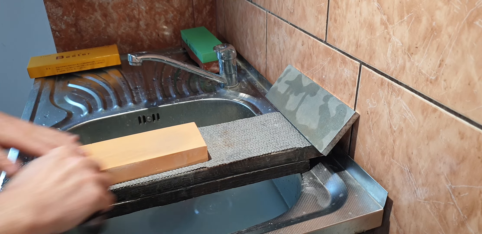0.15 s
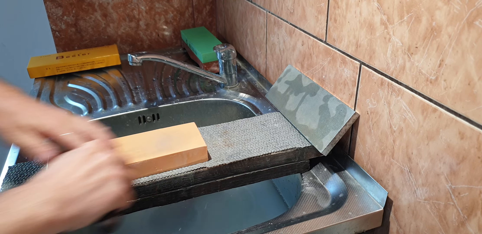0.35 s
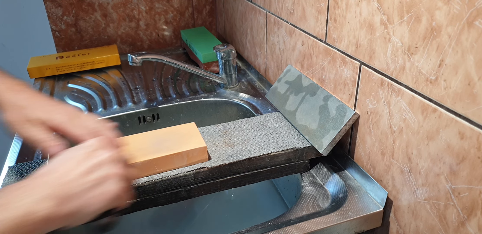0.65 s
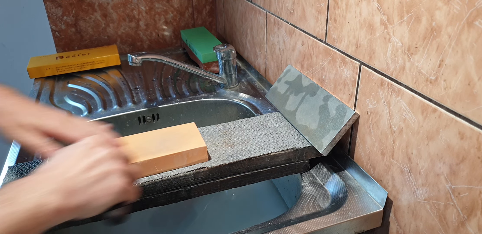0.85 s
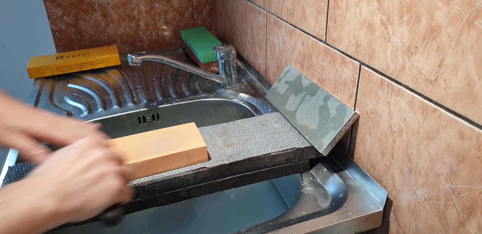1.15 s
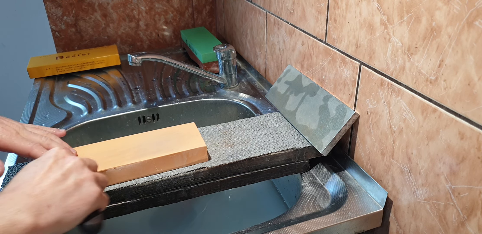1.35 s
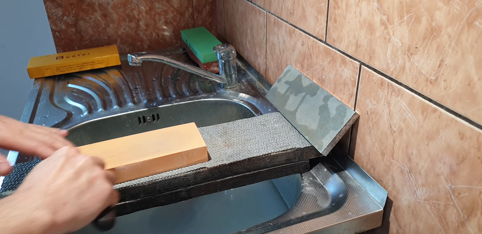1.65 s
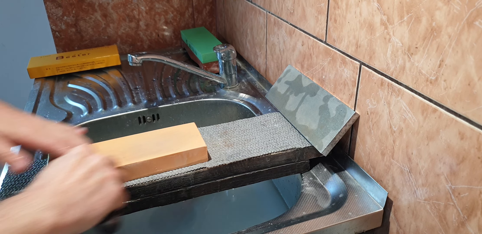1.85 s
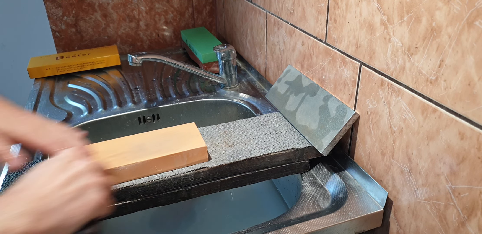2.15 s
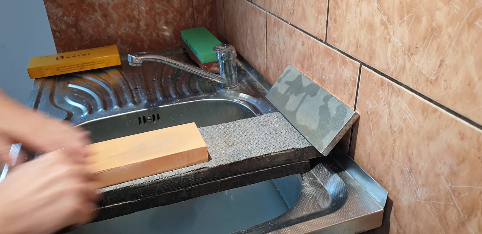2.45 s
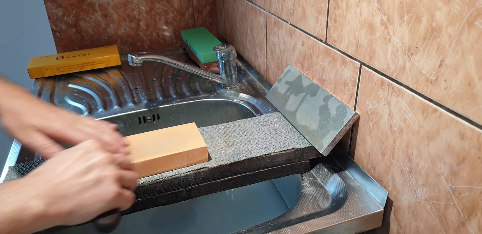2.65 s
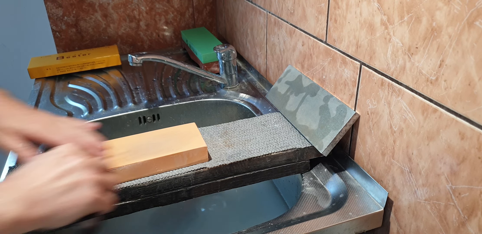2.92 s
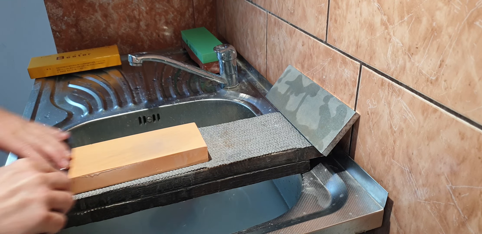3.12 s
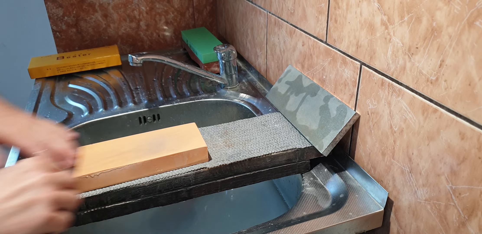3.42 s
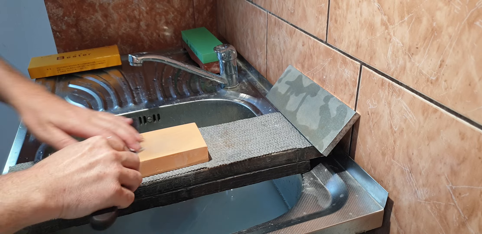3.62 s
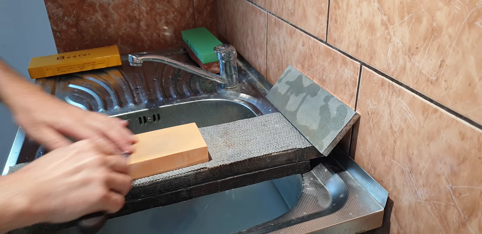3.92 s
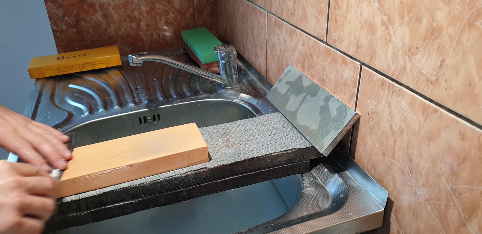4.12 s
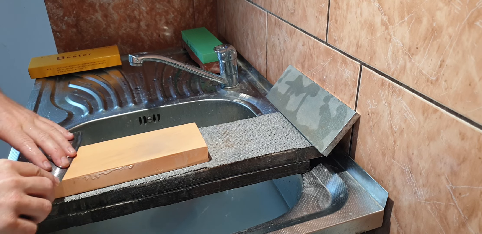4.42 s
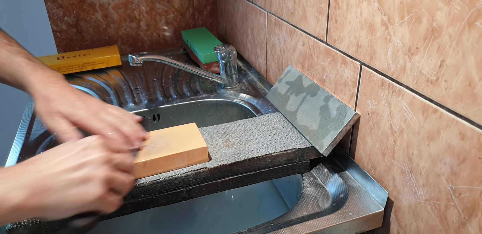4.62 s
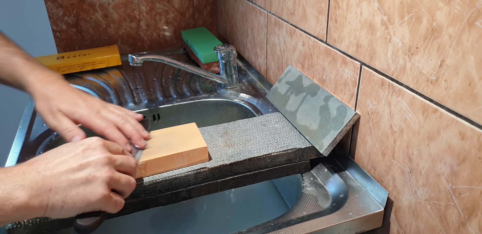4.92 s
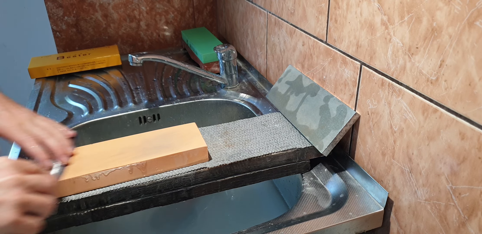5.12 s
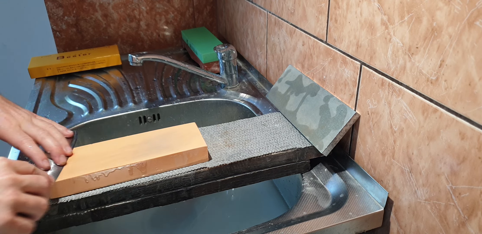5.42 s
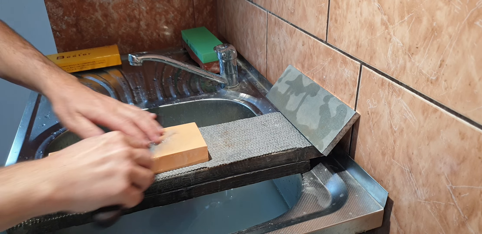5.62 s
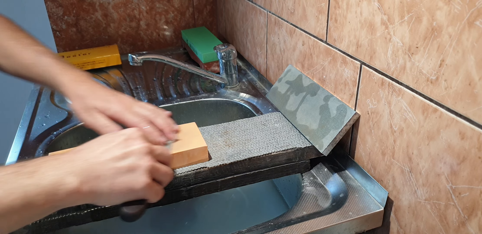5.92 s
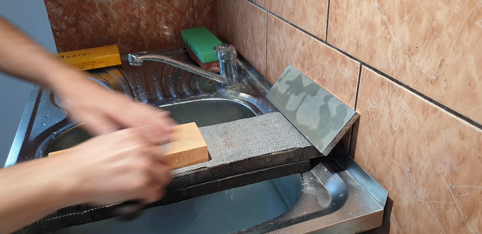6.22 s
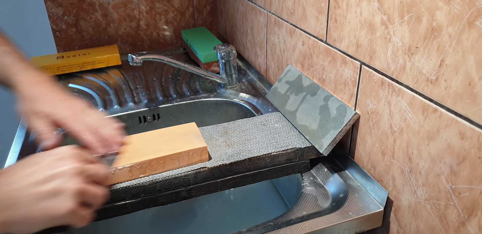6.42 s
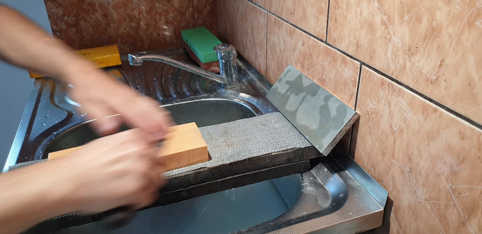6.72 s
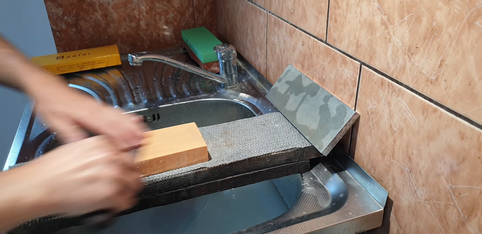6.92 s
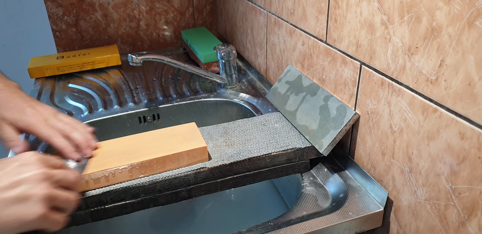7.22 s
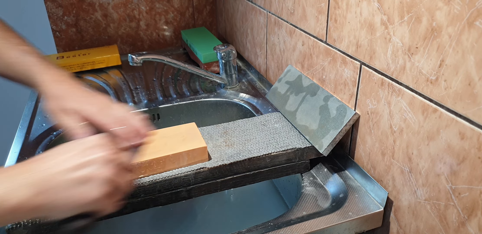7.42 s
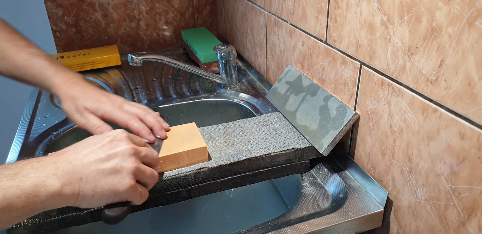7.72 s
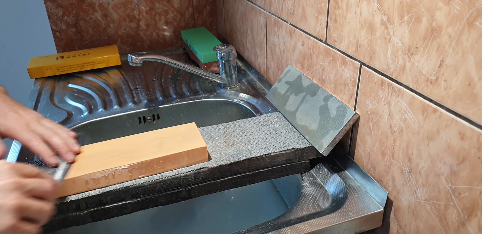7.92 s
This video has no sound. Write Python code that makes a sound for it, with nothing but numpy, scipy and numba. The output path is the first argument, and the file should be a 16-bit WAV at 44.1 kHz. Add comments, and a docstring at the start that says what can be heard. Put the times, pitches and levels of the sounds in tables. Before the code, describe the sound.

A steel knife blade scrapes quickly back and forth on a wet whetstone, gritty rasping and hissing strokes over a metal sink.

```python
"""Knife on a wet whetstone

A steel knife is ground back and forth on a wet whetstone that lies on a plank across a steel sink.
Random grit impulses make the edge hiss and drive moving resonators, the modes of the blade.
Low-coloured noise makes the plank thrum and the basin drum; decaying sines ring the sink at each knock.
Bursts of dense reflections scatter the steel's sound to two microphones, over faint kitchen noise."""
import sys
import numpy as np
from scipy import signal
from scipy.fft import rfft, irfft, next_fast_len
from scipy.io import wavfile
from scipy.ndimage import uniform_filter1d, map_coordinates
from numba import njit

SR = 44100
rng = np.random.default_rng(int(sys.argv[2]) if len(sys.argv) > 2 else 0)


def digitize_waveform(pressure):
    """Quantize a signal to 16-bit integers and store it at the path in sys.argv[1].

    Rows of a 2-D input are taken as channels; values are limited to [-1, 1].
    """
    field = np.atleast_2d(pressure).T
    bounded = np.clip(field, -1, 1)
    quanta = np.round(bounded * 32767).astype(np.int16)
    wavfile.write(sys.argv[1], SR, quanta)


N = 355446
TIME = np.arange(N) / SR

# Passes of the knife, push and return in turn. Levels are ahead of the gains in each source.
# Columns: start_s, hiss_db, rasp_db, lean_db (pressure gained from start to end),
# swell_db (extra pressure in mid-pass), shake_db (peak shaking of the plank),
# ring_hz (mode of the free blade), bend_db (bending note)
PASSES = [(-0.04, -48, -59.5, -3, 3, -64.5, 4200.0, -109), (0.08, -57, -63.5, -3, -2.5, -59.5, 3700, -101),
          (0.232, -43, -52.0, 7, 14, -61, 4700, -106), (0.395, -51, -59, 6.5, -7.5, -59, 4170, -93.0),
          (0.563, -52.5, -58.5, 5, 7, -58.5, 4400, -95), (0.71, -50.5, -57.5, 6, 4, -61.5, 4230, -91),
          (0.875, -44.5, -56.5, 6, 7, -55, 3100, -85), (1.025, -50, -56, 7, -2, -56.0, 4270, -95),
          (1.175, -52.5, -57.0, -1, -1, -53, 4300, -93.0), (1.315, -55, -61, 6, 9, -55, 4270, -83),
          (1.47, -55.5, -62, 6, 7, -60.5, 4450, -96), (1.605, -58.5, -67, -3, 3.0, -61, 3300, -89),
          (1.75, -56.5, -65, 10, 1, -63, 4400, -96), (1.89, -56, -64, 3.0, -6, -54.5, 4650, -104),
          (2.045, -51.5, -58, 7.0, 5, -64.5, 4590.0, -97), (2.19, -54, -59.5, 8.5, -8, -68.5, 4080, -95),
          (2.345, -51, -56, -8, 2.0, -58.5, 4400, -87.0), (2.5, -51.5, -60, 14, -7, -58.5, 4140, -90),
          (2.646, -43.5, -54, -1, 7, -58.5, 4650, -78), (2.8, -49.5, -54.5, 1, -6, -58.5, 4500, -86.0),
          (2.95, -40.5, -52.5, 9, 4.5, -58.5, 3500, -79), (3.1, -49, -56.5, -4, -4.5, -60.5, 4430, -85),
          (3.267, -43, -52, 17, -0.5, -62, 3430, -84), (3.425, -50.0, -55.0, -2.0, -0.5, -61.5, 4530, -81),
          (3.591, -41, -50, -3.5, 10.5, -60.5, 3770.0, -75.5), (3.76, -50, -55.5, 2, -10, -62.5, 3520, -89),
          (3.91, -52, -57, -11, 6, -62, 4500, -85), (4.055, -50.5, -55, 3, 3, -64, 3940, -78.5),
          (4.227, -45.0, -51.5, 16, -0.5, -61, 3630, -73.5),
          (4.375, -50.5, -55.5, -4, -7, -59.5, 2980, -82.0), (4.545, -48, -54, 21.5, 0, -60, 3800, -77),
          (4.71, -49.5, -54.0, -7.0, 2, -62, 3570, -76), (4.883, -45, -53, 3.5, 0, -62.5, 3800, -77.5),
          (5.055, -50, -53.5, 7, 0, -60.5, 4080, -73), (5.213, -48, -54, -7, 4, -64, 3750.0, -76.0),
          (5.365, -52, -54.5, 9, 5, -57.5, 2980, -74.5), (5.539, -46, -52.5, 15, 4, -61.5, 3900, -78),
          (5.71, -50.5, -55, -8.5, -7, -57.5, 4720, -77.5), (5.881, -44, -52, 20, 5, -59.0, 3630, -73.5),
          (6.06, -46, -54, -6, -7, -59, 3640, -76.5), (6.22, -47.5, -53.5, 12, 7.5, -58.5, 3630, -84),
          (6.403, -50, -53.5, -19, 2, -55, 3640, -75.5), (6.579, -46.0, -52.5, 12, -2.5, -55.5, 3730, -82),
          (6.766, -48, -53, -9, 6.5, -57.5, 3730, -76), (6.953, -51.5, -54, -9, 8, -54.5, 3830.0, -80),
          (7.129, -47.5, -51.5, -4.0, -4, -55.0, 3730, -76.5),
          (7.317, -47.5, -54.0, -1, 4, -56, 3750.0, -75.5), (7.48, -46.5, -52, 2, 3, -52, 3680, -76),
          (7.657, -45.5, -53, 13, 1.0, -54, 3730, -73.5), (7.834, -48, -53, 5.5, 2, -56.5, 3810.0, -76.0),
          (8.001, -53, -58.5, 2.0, 1.0, -62, 3880, -77)]
LAST_STOP_S = 8.17  # end of the last push
TURN_DB = -9  # the steel's level dips where the knife turns round


def undb(db):
    """Decibels to amplitude ratio."""
    return 10 ** (np.asarray(db) / 20)


def unit(x):
    """Normalise to rms 1."""
    return x / np.sqrt(np.mean(x ** 2))


def curves(rows):
    """Linear interpolation in time of the columns that follow the seconds."""
    s, *columns = np.transpose(rows)
    return [np.interp(TIME, s, column) for column in columns]


def colour(x, points, share=1):
    """Spectral shaping: gains in dB are joined along log frequency and scaled by share."""
    hz, db = np.transpose(points)
    size = next_fast_len(N + 8192)
    bins_hz = np.maximum(np.fft.rfftfreq(size, 1 / SR), 1)
    gain = undb(share * np.interp(np.log(bins_hz), np.log(hz), db))
    return irfft(rfft(x, size) * gain, size)[..., :N]


@njit
def resonate(x, hz, width):
    """Resonance with a moving centre: a state-variable band-pass of gain 1 at its peak."""
    y, band, low = np.empty(len(x)), 0., 0.
    for i in range(len(x)):
        g, damping = np.tan(np.pi * hz[i] / SR), width / hz[i]
        v = (band + g * (x[i] - low)) / (1 + g * (g + damping))
        low = low + 2 * g * v
        band = 2 * v - band
        y[i] = damping * v
    return y


def walk(rate):
    """Random modulation: `rate` Gaussian knots a second joined by lines, rms 1."""
    knots = rng.standard_normal(8192)
    return unit(np.interp(TIME * rate, np.arange(len(knots)), knots))


def knife(judder_db=1.8, rasp_judder_db=0.5, chatter_db=-0.5, hiss_gain_db=-0.5, rasp_gain_db=1.0,
          bite_hiss_db=-1, bite_rasp_db=-5):
    """Friction excitation: one grit force makes the edge hiss and the blade rasp, both juddering."""
    # the arm's weight rounds every change of speed
    hiss_db, rasp_db = uniform_filter1d(scraping(), SR // 80)
    pressure_db = np.clip(hiss_db - uniform_filter1d(hiss_db, SR // 3), -6, 9)
    judder, surge = catches(), bites()
    force = edge(spot_grains_per_s=2400, scatter_db=-1.5) * undb(chatter_db * walk(520))
    hiss = undb(hiss_db + hiss_gain_db + judder_db * judder) + undb(bite_hiss_db) * surge
    rasp = undb(rasp_db + rasp_gain_db + rasp_judder_db * judder) + undb(bite_rasp_db) * surge
    return hiss * grinding(force, pressure_db) + rasp * blade(force, pressure_db)


def passes():
    """Kinematics at every moment: number of the pass, its progress 0-1, and the knife's speed 0-1."""
    push_attack_s, push_release_s = 0.016, 0.016
    return_attack_s, return_release_s = 0.0047, 0.026
    turns = np.append(np.array(PASSES)[:, 0], LAST_STOP_S)
    number = np.searchsorted(turns, TIME) - 1
    age, left = TIME - turns[number], turns[number + 1] - TIME
    is_return = number % 2
    attack = np.where(is_return, return_attack_s, push_attack_s)
    release = np.where(is_return, return_release_s, push_release_s)
    speed = np.tanh(age / attack) * np.tanh(left / release)
    return number, age / (age + left), speed


def scraping():
    """Friction grows with load: hiss and rasp levels follow the hands' pressure and dip at each turn."""
    rasp_follows = 0.47  # share of the pressure that the rasp follows
    number, progress, speed = passes()
    _, hiss_db, rasp_db, lean_db, swell_db, *_ = np.array(PASSES)[number].T
    mid_pass = np.sin(np.pi * progress) - 2 / np.pi  # mean 0 over a pass
    press_db = lean_db * (progress - .5) + swell_db * mid_pass
    return np.array([hiss_db + press_db, rasp_db + rasp_follows * press_db]) + TURN_DB * (1 - speed)


def catches(per_s=28, release_s=0.022):
    """Stick and slip: friction jumps at random moments and then lets go; mean 0, rms 1."""
    jumps = (rng.random(N) < per_s / SR) * (1 + rng.random(N))
    grip = signal.lfilter([1], [1, -np.exp(-1 / (release_s * SR))], jumps)
    return unit(grip - grip.mean())


def bites():
    """Transient friction: brief surges with a straight rise and a Gaussian decay as the edge bites."""
    # the edge bites into the stone: start_s, level_db (ahead of rise, decay and gains), length_s
    bite_rows = [(0.244, -64, 0.0082), (0.728, -51, 0.031), (2.663, -62, 0.011), (3.013, -48.5, 0.079),
                 (3.116, -52, 0.016), (3.723, -52, 0.0094), (4.035, -45, 0.013), (4.071, -55, 0.0099),
                 (4.305, -45, 0.017), (4.392, -48, 0.01), (4.667, -43, 0.011), (5.028, -50, 0.0053),
                 (5.376, -51, 0.0091), (5.722, -51.5, .014), (6.072, -53, 0.037), (6.413, -66, 0.017),
                 (7.147, -57, 0.0066), (7.23, -55, 0.036), (7.533, -45, 0.011), (7.909, -52, 0.026)]
    rise_s = .002
    surge = np.zeros(N)
    for start_s, level_db, length_s in bite_rows:
        age = np.maximum(TIME - start_s, 0)
        decay = np.exp(-np.minimum(age / length_s, 10) ** 2)
        surge += undb(level_db) * np.minimum(age / rise_s, 1) * decay
    return surge


def grit(grains_per_s, scatter_db):
    """Shot noise: abrasive grains chip the steel in random clicks of very uneven size; rms 1."""
    struck = rng.random(N) < grains_per_s / SR
    size = rng.standard_normal(N) * undb(scatter_db * rng.standard_normal(N))
    return unit(struck * size)


def edge(spot_grains_per_s, scatter_db, path_t60=0.013, count=8):
    """Superposition: spots grind at once, each reaching two microphones by its own paths."""
    return unit(sum(tiles(grit(spot_grains_per_s, scatter_db), path_t60) for _ in range(count)))


def shifting(x, patchy_db, patch_hz=149.0, turns_per_s=16.):
    """Time-varying response: the blade's weak resonances come and go as its contact slides."""
    hz, s, frames = signal.stft(x, SR, nperseg=1024)
    where = np.meshgrid(hz / patch_hz, s * turns_per_s, indexing="ij")
    pattern = unit(map_coordinates(rng.standard_normal((256, 256)), where, order=1, mode="wrap"))
    return signal.istft(frames * undb(patchy_db * pattern), SR, nperseg=1024)[1][:, :N]


def grinding(force, pressure_db, patchy_db=2.96, keen_hz=13400.0, keen_width_hz=4600.0, keen_db=-9,
             keen_by_pressure=0.84):
    """Broadband friction noise: the edge's fine hiss gains a keen top when the steel is pressed hard."""
    # broad colour of the hiss, relative: pitch_hz, level_db
    hiss_colour = [(4000, -54), (6500, -35.5), (7700, -21.5), (8500, -11), (9700, -3.5), (10800, -0.5),
                   (12300, -1), (13600, -5), (14500, -4), (15800, -10.5)]
    top = np.array([resonate(ear, np.full(N, keen_hz), keen_width_hz) for ear in force])
    keen = undb(keen_db + keen_by_pressure * pressure_db)
    mixed = (force + keen * top) / (1 + keen / 2)
    return unit(colour(shifting(mixed, patchy_db), hiss_colour))


def blade(force, pressure_db, drift=0.0094, wander_db=4.0, slide_db=3.5, slide_width_hz=260.0,
          slide_by_pressure=0.45, patchy_db=3.0):
    """Modal excitation: place and pressure of the contact decide which modes the grit rings."""
    # where the blade lies on the stone: time_s, place (0 heel, 1 belly, 2 tip)
    contact = [(0, 0), (.85, 0.49), (.95, .67), (1.08, 0), (2.4, 0.0083), (2.75, 0.63), (3.6, 1.47),
               (5.5, 1.16), (6.1, 1.43), (6.5, 0.28)]
    # blade modes, ahead of drift and the rasp's colour: pitch_hz, width_hz,
    # heel_db, belly_db, tip_db, by_pressure (dB gained per dB of pressure)
    modes = [(2073, 154, 10.5, -8, -39, -0.36), (2270, 25.5, 10, 8.5, 7, 0.1),
             (2785, 45, 2, -2.5, -4, -0.4), (3046, 210, -21, 2.5, -10, -0.4), (3350, 150, -58, -5, 1, 0.3),
             (3803, 17, -56, 4, 16, 1.05), (4200, 73, -21, -20, 5, 0.6), (4620, 94, -10, 3.5, -20, 0),
             (5064, 180, -4.5, 3, 5, 0.5), (5610, 96, -12, 10.5, -18, 1.24)]
    # broad colour of the rasp, relative: pitch_hz, level_db
    rasp_colour = [(500, -45), (1000, -28), (1880, -24.5), (2150, -10.5), (2500, -7.5), (2800, -1.5),
                   (3500, -1), (5600, -2), (6300, -3.5), (7500, -8.5), (9000, -11.5), (12000, -40)]
    place, = curves(contact)
    slide_hz = free_ring()
    slide_gain = undb(slide_db + slide_by_pressure * pressure_db)
    ring = force + slide_gain * np.array([resonate(ear, slide_hz, slide_width_hz) for ear in force])
    for hz, width, *place_db, by_pressure in modes:
        mode_db = np.interp(place, np.arange(3), place_db)
        gain = undb(mode_db + by_pressure * pressure_db + wander_db * walk(13))
        centre = hz * (1 + drift * walk(12))
        ring = ring + np.array([resonate(gain * ear, centre, width) for ear in force])
    ring = colour(shifting(ring, patchy_db), rasp_colour)
    # the modes share out the power that friction supplies
    power = uniform_filter1d(np.mean(ring ** 2, axis=0), SR // 20)
    return ring / np.sqrt(power)


def free_ring(wander=0.011):
    """Length tunes a bar: the mode of the free length of blade glides from pass to pass."""
    number, _, _ = passes()
    *_, hz, _ = np.array(PASSES)[number].T
    return uniform_filter1d(hz, SR // 15) * (1 + wander * walk(18))


def flex(width_hz=147.0, gain_db=-0.3, wander_db=2.5):
    """Bending resonance: grit through two equal band-passes gives the whole blade's hollow note."""
    hz, db = bending()
    ears = []
    for _ in range(2):
        once = resonate(grit(grains_per_s=6000, scatter_db=-4.0), hz, width_hz)
        ears.append(resonate(once, hz, width_hz))
    return undb(db + gain_db + wander_db * walk(22)) * unit(np.array(ears))


def bending(wander_hz=22.):
    """Moving support: pitch and level of the bending note swing with travel along the stone."""
    # lowest bending mode, tuned by the pressing fingers, ahead of swing and wander: time_s, pitch_hz
    bend = [(2.5, 1310), (4.25, 1380), (5.3, 1390), (6.1, 1394), (6.4, 1394), (7.1, 1410), (7.4, 1480),
            (8.06, 1426)]
    swing_hz, swing_db = 43.5, 3.5  # highest and loudest where a push begins
    number, progress, speed = passes()
    *_, bend_db = np.array(PASSES)[number].T
    hz, = curves(bend)
    travel = np.cos(np.pi * (number + progress))
    db = uniform_filter1d(bend_db + swing_db * travel + TURN_DB * (1 - speed), SR // 60)
    return hz + swing_hz * travel + wander_hz * walk(16), db


def scatter(t60):
    """Diffuse reflection: an exponentially decaying noise burst for each microphone, energy 1."""
    t = TIME[:int(t60 * SR) + 8]
    burst = rng.standard_normal((2, len(t))) * np.exp(-np.log(1000) * t / t60)
    return burst / np.sqrt(np.sum(burst ** 2, axis=1, keepdims=True))


def tiles(x, t60):
    """Reverberation by convolution: sound scattered by the sink and the tiled walls."""
    return signal.oaconvolve(np.atleast_2d(x), scatter(t60), axes=1)[:, :N]


def plank(thrum_gain_db=0, basin_db=-64.0, basin_follows=0.22):
    """Forced vibration: friction shakes the plank at its low resonance and drums the basin beneath."""
    # spectrum of the plank's thrum, relative: pitch_hz, level_db
    thrum_colour = [(22, -53), (32, -36), (42, -12), (56, -14), (68, 0), (76, 1.5), (86, -11.5), (112, -8),
                    (150, -20), (250, -57.5)]
    # spectrum of the drumming basin, relative: pitch_hz, level_db
    basin_colour = [(80, -18), (115, 0.5), (150, 1.5), (200, 4.5), (245, 2.5), (270, 3.5), (297, 4.5),
                    (328, -6), (362, -9), (400, -14), (435, -10), (465, -8.5), (495, -10), (570, -20),
                    (800, -30), (2000, -25)]
    shake_db = shaking()
    thrum = unit(colour(rng.standard_normal(N), thrum_colour))
    basin = unit(colour(grit(grains_per_s=3700, scatter_db=0.5), basin_colour))
    basin_level_db = basin_db + basin_follows * (shake_db - shake_db.mean())
    return undb(shake_db + thrum_gain_db) * thrum + undb(basin_level_db) * basin


def shaking():
    """Impulse and settling: each pass jolts the plank, whose shaking peaks early and then subsides."""
    swell_db, skew = 8.5, 0.55  # a skew below 1 moves the peak towards the start
    number, progress, _ = passes()
    *_, peak_db, _, _ = np.array(PASSES)[number].T
    swell = np.sin(np.pi * progress ** skew) - 1
    return uniform_filter1d(peak_db + swell_db * swell, SR // 40)


def knocks(gain_db=-4, thud_db=-8, thud_t60=0.15, detune=0.036):
    """Impact excitation: the plank's blows ring the sink; a soft contact leaves out the upper modes."""
    # the plank rocks on the sink rim: start_s, level_db (ahead of gain_db),
    # hardness_hz (low-pass cutoff of the contact)
    blows = [(.001, -50.5, 740), (0.339, -56, 600), (.354, -49, 670), (1.262, -51.5, 1200),
             (1.273, -47.5, 900), (1.55, -51, 600), (1.571, -49, 680), (1.816, -43, 1080),
             (1.826, -52, 1090), (1.843, -45, 555), (1.856, -49, 452)]
    # sink modes: pitch_hz (ahead of detuning), level_db (relative), t60_s
    sink = [(101.7, -5, 0.8), (167, -6.5, 0.24), (292.6, -5.5, 0.52), (379, 3, 0.098), (449, -13, 0.63),
            (492, -3.5, 0.25), (513, -40, .1), (639, -17, 0.33), (890, -67, .16), (890, -28, 0.056),
            (1144, -23, 0.48), (1290, -37, 0.22), (1355, -16, 0.15)]
    out, t = np.zeros(N + SR), TIME[:SR // 2]
    hz, mode_db, t60 = np.transpose(sink)[:, :, None]
    thud_band = signal.butter(2, [250, 1200], "band", fs=SR, output="sos")
    for start_s, level_db, hardness_hz in blows:
        tuned = hz * (1 + detune * rng.standard_normal(hz.shape))
        decay = np.exp(-np.log(1000) * t / t60)
        ring = np.sum(undb(mode_db) * decay * np.sin(2 * np.pi * tuned * t), axis=0)
        thud = unit(signal.sosfilt(thud_band, rng.standard_normal(len(t))))
        blow = ring + undb(thud_db) * thud * np.exp(-np.log(1000) * t / thud_t60)
        softness = signal.butter(2, hardness_hz, fs=SR, output="sos")
        start = int(start_s * SR)
        out[start:start + len(t)] += undb(level_db + gain_db) * signal.sosfilt(softness, blow)
    return out[:N]


def kitchen(level_db=-73):
    """Ambient noise: independent coloured noise at each microphone."""
    # spectrum of the kitchen's noise, relative: pitch_hz, level_db
    kitchen_colour = [(20, -10), (32, -25), (50, -2), (120, -4.5), (300, -24.5), (700, -22), (2000, -26.5),
                      (16000, -59)]
    return undb(level_db) * unit(colour(rng.standard_normal((2, N)), kitchen_colour))


def scene(room_db=-13, room_t60=0.096, spread_db=-9):
    """Interaural coherence: the steel arrives scattered and unlike, the bass nearly alike."""
    # colour that tells left from right, ahead of each side's share: pitch_hz, level_db
    ears = [(60, -7), (300, -8), (800, -1), (1400, -11.5), (1850, -1.5), (2250, -20), (2900, -10.5),
            (3750, -13), (5700, -9), (7200, -2), (8500, 16), (9800, 9), (11200, -1), (13300, -5),
            (15500, 0)]
    steel = knife() + flex()
    steel = steel + undb(room_db) * tiles(steel, room_t60)
    # a second, independent draw of plank and knocks, opposite in the two ears,
    # spreads the bass body slightly in stereo
    side = colour(plank() + knocks(), [(70, -5.5), (250, -4), (600, 6.5)])
    opposed = np.array([[1], [-1]]) * side
    body = plank() + knocks() + undb(spread_db) * opposed
    left, right = steel + body
    return np.array([colour(left, ears, share=0.37), colour(right, ears, share=-.5)]) + kitchen()


def record(dry):
    """Band limiting: a steep elliptic low-pass at 15800 Hz removes the extreme treble."""
    return signal.sosfilt(signal.ellip(12, .2, 70, 15800, fs=SR, output="sos"), dry)


dry = scene()
out = record(dry)
digitize_waveform(out)
```